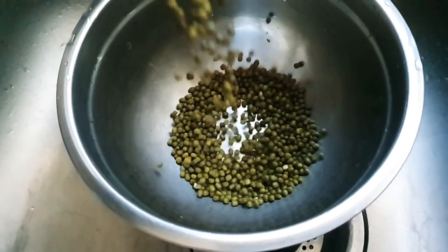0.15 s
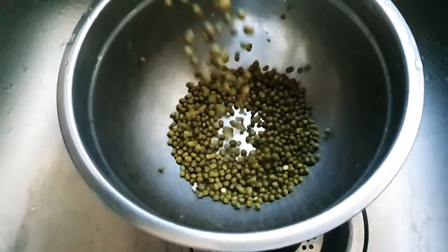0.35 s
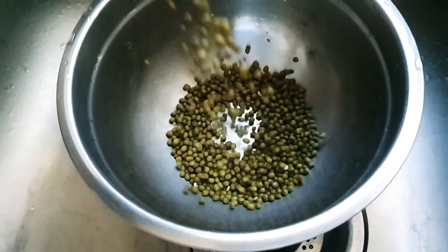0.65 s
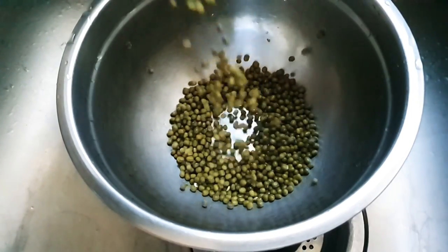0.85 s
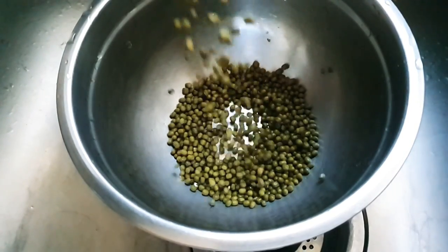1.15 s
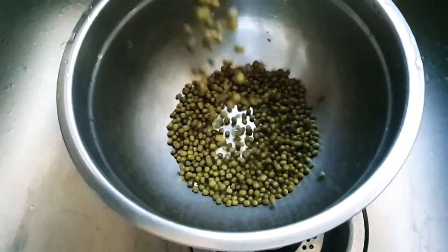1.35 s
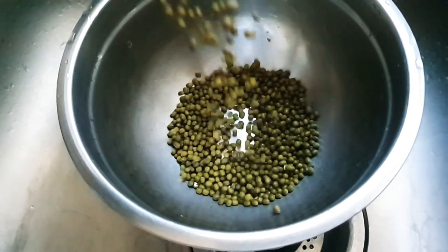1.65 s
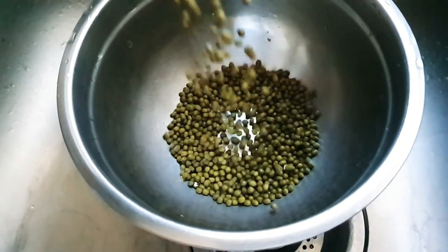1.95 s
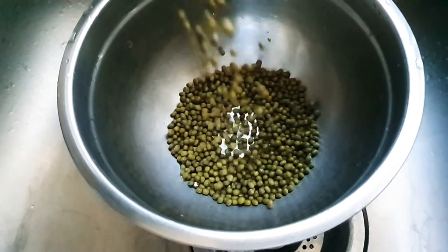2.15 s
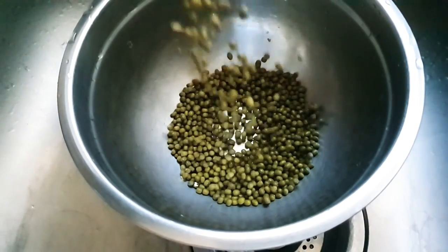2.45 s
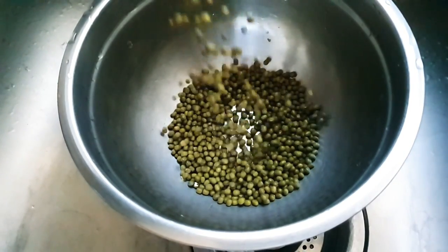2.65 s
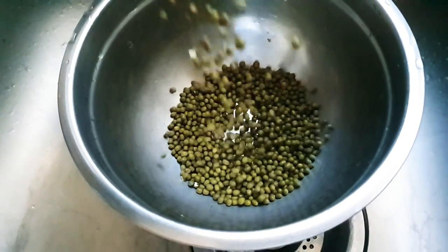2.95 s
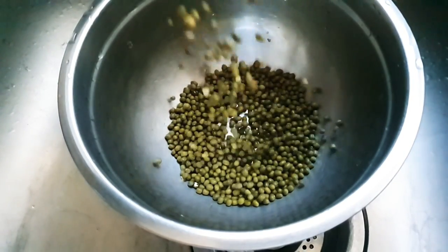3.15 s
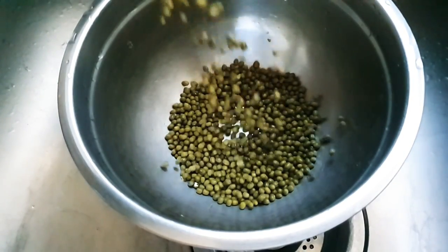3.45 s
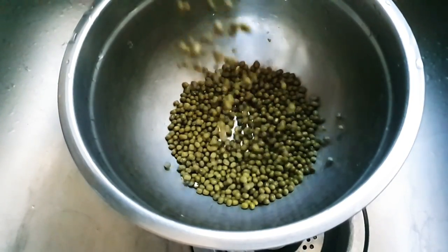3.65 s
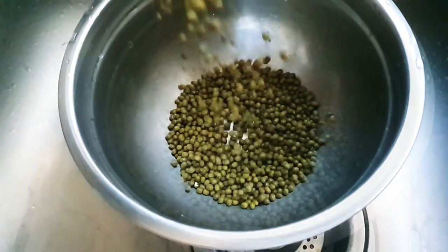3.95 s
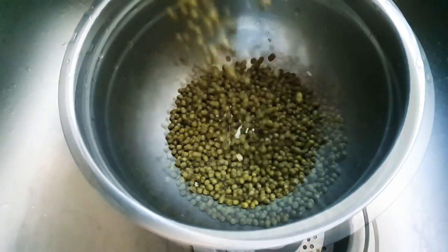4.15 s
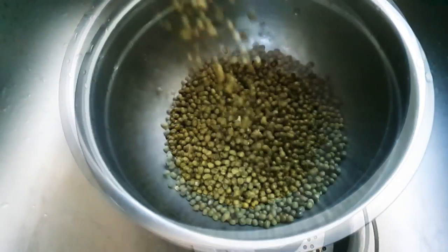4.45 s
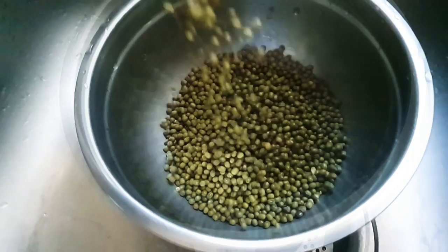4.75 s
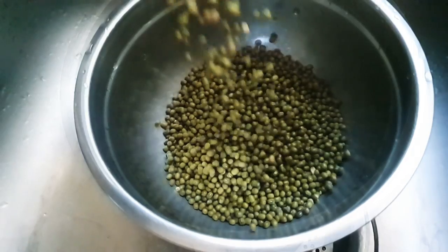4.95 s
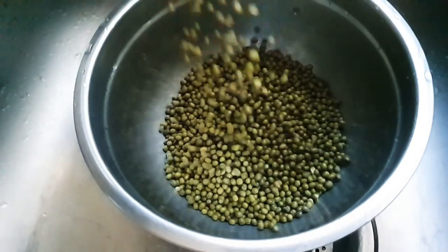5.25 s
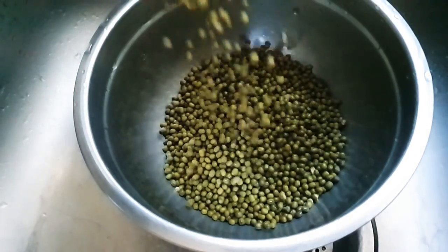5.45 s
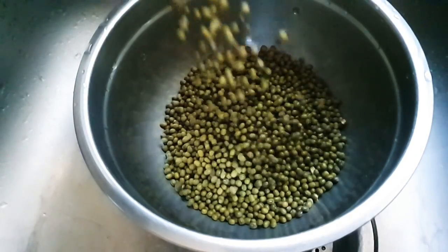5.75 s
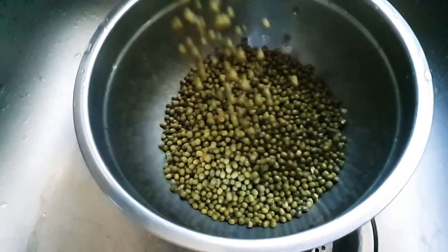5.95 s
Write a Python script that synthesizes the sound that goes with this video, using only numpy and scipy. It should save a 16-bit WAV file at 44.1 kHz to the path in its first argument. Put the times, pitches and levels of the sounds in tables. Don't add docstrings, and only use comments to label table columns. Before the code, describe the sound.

Hard little beans clatter into a metal bowl in a kitchen, already pouring from the start. The close two-sided microphone is dull, loud and overloaded, crackling often in the first two seconds and hard at about 2.5. Boomy bottom thuds and short metallic pings pepper the dense rattle. It softens after four seconds, then ends in bright ringing bursts, with a faint rumble beneath.

```python
import sys
import numpy as np
from scipy import signal
from scipy.fft import rfft, irfft, next_fast_len
from scipy.io import wavfile
from scipy.ndimage import uniform_filter1d, minimum_filter1d

SR = 44100
rng = np.random.default_rng(int(sys.argv[2]) if len(sys.argv) > 2 else 0)


def log_audio(samples):
    frames = np.atleast_2d(samples).T
    limited = np.clip(frames, -1, 1)
    pcm = np.round(limited * 32767).astype(np.int16)
    wavfile.write(sys.argv[1], SR, pcm)


def voltage_ratio(level):
    return 10 ** (np.asarray(level, float) / 20)


N = 269451
TOP_HZ = 3000
# low_hz, high_hz
WALL_BAND_HZ = (960, 1650)

# time_s, level_db
RUMBLE_LEVEL = [
    (0.0, -34),
    (0.5, -38),
    (1.5, -38.5),
    (3.499, -36),
    (4.34, -42.5),
    (4.88, -38.5),
    (5.33, -32.5),
    (6.0, -31),
    (6.11, -37.5),
]
# frequency_hz, density_db_per_hz
RUMBLE_SPECTRUM = [(20, -6.5), (32, -2.5), (38, 3), (46, -7.5), (68, -9), (85, -9.5), (98, 1), (125, -7.5),
                   (170, -13.5), (250, -1)]
# frequency_hz, width_hz, left_db, right_db, right_lag_turns
FLOOR_MODES = [
    (269, 13, 7.5, -2, 0.02),
    (337, 21, -5, -11, 0.37),
    (470, 27, -22, -19, 0.046),
    (566.4, 10, -1, -6, 0.23),
    (614, 65, -14.5, -16.5, 0.82),
]
# frequency_hz, density_db_per_hz
LEFT_PORT_SPECTRUM = [(150, -22), (250, -5.5), (400, -5.5), (650, -4.5), (760, -10), (910, -10.5),
                      (990, -6.5), (1150, -1.5), (1450, -3), (1850, -14), (2300, -10), (2590, -10),
                      (2780, -15.5), (2980, -33.5)]
RIGHT_PORT_SPECTRUM = [(150, -12), (230, -6), (500, -5), (880, -13.5), (990, -16), (1090, 1), (1280, 0),
                       (1410, 3.5), (1550, -8), (1750, -14), (2050, -14.5), (2280, -10.5), (2520, -13.5),
                       (2900, -38.5)]

# time_s, flow_db, floor_cover_share (0 bare to 1 under the heap)
STREAM_FLOW = [(0.0, -15.5, 0.05), (0.449, -17, 0.23), (1.0, -17, 0.12), (1.6, -18, 0),
               (2.301, -16.5, 0.36), (2.9, -18, 0), (3.7, -17.5, 0.19), (4.001, -22, 0.2),
               (4.399, -24.5, 0.1), (4.999, -26.5, 0.7), (5.402, -24.5, 0.8), (5.75, -26.5, 1),
               (6.11, -23.5, 0.8)]
# landing_s, lull_db, lull_length_s, spurt_db
HAND_SHAKES = [(0.354, -5.5, 0.13, 8), (0.428, -5.5, 0.067, 3.5), (0.581, 0, 0.049, 3.5),
               (0.736, -2.5, 0.034, -0.5), (0.842, -1, 0.06, 3), (0.975, -7.5, 0.06, -1.5),
               (1.05, -4, 0.04, 5), (1.226, -5, 0.094, 3.5), (1.486, -2.5, 0.038, 7), (1.575, -8, 0.03, 0),
               (2.099, -3, 0.044, 0), (2.261, -3, 0.063, 1), (2.529, -12, 0.061, 2), (2.763, -7, 0.084, 1),
               (2.986, -3.5, 0.064, -1.5), (3.121, -3.5, 0.079, -1.5), (3.333, -6.5, 0.17, -1),
               (3.699, -4, 0.12, -1), (3.933, -4, 0.27, 3), (4.35, -5, 0.27, 2), (4.453, -6, 0.05, 1.5),
               (4.688, -7, 0.062, 2.5), (5.227, -4.5, 0.23, 4.5), (5.518, -2.5, 0.22, 8),
               (5.593, -1, 0.017, 5), (5.772, -2.5, 0.11, 16), (5.865, 0, 0.019, 7),
               (5.955, 1.5, 0.027, 10), (6.01, -3, 0.02, 5), (6.05, -5, 0.02, 8)]
# loudest_s, over_stream_db, half_length_s
FLOOR_THUMPS = [(0.01, 13.5, 0.021), (0.175, 11.5, 0.07), (0.298, 17.5, 0.022), (0.356, 12.5, 0.03),
                (0.481, 14, 0.063), (0.631, 12, 0.05), (0.743, 11, 0.027), (0.863, 14, 0.055),
                (0.907, 9.5, 0.013), (1.0, 15, 0.02), (1.066, 13.5, 0.033), (1.241, 14, 0.038),
                (1.343, 11, 0.03), (1.522, 14.5, 0.04), (1.63, 9, 0.024), (1.7, 13, 0.02),
                (1.847, 10, 0.06), (1.995, 8.5, 0.07), (2.143, 12, 0.045), (2.326, 15.5, 0.027),
                (2.393, 14, 0.025), (2.639, 7, 0.058), (2.971, 12, 0.02), (3.252, 19.5, 0.016),
                (3.389, 9, 0.035), (3.603, 8, 0.04), (3.7, 11, 0.018), (3.955, 11, 0.052), (4.484, 6, 0.04),
                (4.697, 14.5, 0.035)]
# start_s, peak_db, pitch_hz, left_over_right_db
WALL_STRIKES = [(0.3618, -4.5, 1415, -6), (0.428, -6.5, 1358, -6.5), (0.618, -8.5, 1443, 1),
                (0.889, -8, 1200, 1), (1.0515, 0, 1158, 4.5), (1.1677, -6.5, 1254, -1),
                (1.5771, -4, 1158, -2), (1.6164, -3.5, 1280, -4), (1.9056, -9.5, 1327, -7.5),
                (2.1093, -10.5, 1353, -5), (2.5325, 7, 1240, -8), (2.662, -12, 1383, -2.5),
                (3.0092, -7, 1280, 8.5), (3.202, -11, 1375, 0), (3.456, -11.5, 1096, 0),
                (3.5895, -9.5, 1300, 2.5), (3.7603, -6, 1358, -5), (4.1233, -5, 1130, 6),
                (4.922, -8, 1227, -9.5), (5.241, -15.5, 1302, -6.5), (5.279, -4, 1420, -4),
                (5.3581, -11.5, 1368, -12), (5.5247, -13.5, 1400, -9.5), (5.604, -5, 1320, -1.5),
                (5.765, -6.5, 1383, -4.5), (5.804, -1, 1377, -13), (5.8626, -3, 1388, -4),
                (5.953, -3, 1378, -15), (6.0167, -2.5, 1248, -3.5), (6.0558, 0.5, 1346, -10.5)]

# landing_s, crackle_db
LEFT_OVERLOADS = [(0.096, -42.5), (0.106, -33.5), (0.151, -37), (0.168, -31.5), (0.372, -36.5),
                  (0.5, -35.5), (0.596, -29), (0.612, -36.5), (0.661, -41), (0.749, -31), (0.811, -42),
                  (0.852, -32), (0.891, -39), (0.911, -42), (1.25, -36.5), (1.262, -35), (1.368, -40.5),
                  (1.518, -36.5), (1.756, -41), (1.771, -42), (1.911, -37), (1.978, -42), (2.058, -35.5),
                  (2.142, -38.5), (2.421, -36.5), (2.544, -28.5), (2.835, -42.5), (3.013, -39), (3.39, -35),
                  (3.457, -40.5)]
RIGHT_OVERLOADS = [(0.131, -37), (0.161, -37), (0.178, -36.5), (0.213, -30), (0.365, -28), (0.516, -41.5),
                   (0.819, -36.5), (0.844, -39.5), (1.243, -39), (1.359, -42.5), (1.508, -35.5),
                   (2.536, -17.5), (3.766, -44.5), (5.798, -41.5), (5.944, -50), (5.956, -29.5),
                   (5.969, -59), (6.06, -25), (6.072, -47)]
# landing_s, left_crackle_db,
# right_crackle_db
BOTH_OVERLOADS = [(0.188, -45, -48), (0.207, -30.5, -34), (0.457, -30.5, -25), (0.471, -34, -35),
                  (0.512, -42, -70), (0.545, -48, -48), (0.56, -46, -70), (0.625, -29.5, -41),
                  (0.639, -32, -31), (0.668, -46, -42), (0.681, -44, -70), (1.053, -42, -70),
                  (1.068, -25, -37), (1.082, -30, -35), (1.381, -44, -70), (2.068, -35.5, -45),
                  (2.111, -41, -39.5), (2.191, -44, -70), (2.539, -30, -20), (5.807, -46, -25),
                  (5.815, -70, -38), (5.866, -36, -34), (5.873, -70, -33)]


def evened(x):
    return x / np.sqrt(np.mean(x ** 2) + 1e-20)


def read(spectrum, hz):
    f, value = np.transpose(spectrum)
    return np.interp(np.log(hz + 1), np.log(f + 1), value)


def colour(x, gain):
    size = next_fast_len(x.shape[-1])
    hz = np.fft.rfftfreq(size, 1 / SR)
    return irfft(rfft(x, size) * gain(hz), size)[..., :x.shape[-1]]


def above(hz, edge_hz):
    return 1 / np.sqrt(1 + np.exp(24 * np.log(edge_hz / (hz + 1) + 1e-9)))


def between(low_hz, high_hz):
    return lambda hz: above(hz, low_hz) * above(high_hz, hz)


def steadied(x, seconds, share):
    power = uniform_filter1d((x ** 2).mean(0), round(seconds * SR))
    return evened(x / (abs(power) + 1e-12) ** (share / 2))


def ports(hz):
    level_db = np.array([read(LEFT_PORT_SPECTRUM, hz), read(RIGHT_PORT_SPECTRUM, hz)])
    return voltage_ratio(level_db) * (hz < TOP_HZ)


def rumble():
    time_s, level_db = np.transpose(RUMBLE_LEVEL)
    both, left, right = rng.standard_normal((3, N))
    own = colour(np.array([left, right]), lambda hz: np.clip(hz / 120, .3, 1))
    shake = colour(1.6 * both + own, lambda hz: voltage_ratio(read(RUMBLE_SPECTRUM, hz)) * (hz < 250))
    level_db = np.interp(np.arange(N) / SR, time_s, level_db)
    return voltage_ratio(level_db + np.array([[0.6], [-3.6]])) * evened(shake)


def landings(per_s, spread_db):
    size = voltage_ratio(spread_db * np.minimum(rng.exponential(1, N), 5))
    lands = rng.random(N) < per_s / SR
    return size * lands * rng.choice([-1., 1.], N)


def knocks():
    blows = landings(per_s=70, spread_db=4.0)
    side = voltage_ratio(5.0 * rng.uniform(-1, 1, N))
    t = np.arange(SR // 200) / SR
    blow = rng.standard_normal((2, len(t))) * voltage_ratio(-60 * t / 0.004)
    return evened(signal.oaconvolve(blows * np.array([side, 1 / side]), blow, axes=1)[:, :N])


def strays(flow_db):
    per_s, over_flow_db = 7.3, 1
    gap, size, pitch, side = rng.random((90, 4)).T
    start_s = np.cumsum((.4 + 1.2 * gap) / per_s)
    peak_db = np.interp(start_s, np.arange(N) / SR, flow_db) + over_flow_db + 6 * (size - .5)
    rows = zip(start_s, peak_db, 1080 + 340 * pitch, 14 * (side - .7))
    return [row for row in rows if row[0] < N / SR]


def strikes(rows):
    t, out = np.arange(SR // 10) / SR, np.zeros((2, N + SR))
    shape = (1 - np.exp(-t / 0.0014)) * voltage_ratio(-60 * t / 0.039)
    for (start_s, peak_db, pitch_hz, pan_db), chance in zip(rows[::-1], rng.random((150, 6))):
        split_hz, phase_turns = 60 + 60 * chance[:2, None], 0.38 * chance[2:4, None]
        beat = np.cos(2 * np.pi * (split_hz * t + phase_turns))
        pair = np.sin(2 * np.pi * pitch_hz * t) * beat
        click_hz = 2200 + 450 * chance[4:, None]
        click = np.sin(2 * np.pi * click_hz * t) * voltage_ratio(-8 - 60 * t / 0.01)
        level = voltage_ratio(peak_db + 3.5 + np.array([[.5], [-.5]]) * pan_db)
        at = round(start_s * SR)
        out[:, at:at + len(t)] += level * shape * (pair + click)
    return out[:, :N]


def boom(hits):
    t, ring = np.arange(SR // 6) / SR, 0
    for hz, width_hz, left_db, right_db, lag_turns in FLOOR_MODES:
        swing = np.sin(2 * np.pi * (hz * t - np.array([[0], [lag_turns]])))
        decay = np.sqrt(width_hz) * np.exp(-np.pi * width_hz * t)
        ring = ring + voltage_ratio(np.array([[left_db], [right_db]])) * decay * swing
    return signal.oaconvolve(hits[None], ring, axes=1)[:, :N]


def thumping(t):
    runs = (voltage_ratio(db) ** 2 * np.exp(-((t - s) / half_s) ** 2) for s, db, half_s in FLOOR_THUMPS)
    return np.sqrt(1 + sum(runs))


def floor_boom(hits):
    off_centre = boom(landings(per_s=3700, spread_db=2.0)) * np.array([[.15], [.7]])
    return colour(steadied(boom(hits) + off_centre, 0.16, 0.89), lambda hz: above(hz, 234))


def scatter(hits, t60, shared, count=5):
    t = np.arange(SR // 7) / SR
    spot = rng.integers(0, count, N)
    both, left, right = rng.standard_normal((3, count, len(t))) * voltage_ratio(-60 * t / t60)
    modes = rfft(np.sqrt(shared) * both + np.sqrt(1 - shared) * np.array([left, right]))
    modes /= np.sqrt(uniform_filter1d((abs(modes) ** 2).mean(1, keepdims=True), size=5))
    rings, size = irfft(modes, len(t)), next_fast_len(N + len(t))
    hits_by_spot = hits * (spot == np.arange(count)[:, None])
    return irfft((rfft(hits_by_spot, size) * rfft(rings, size)).sum(1), size)[:, :N]


def heap_thuds(hits):
    thud = colour(scatter(hits, t60=0.082, shared=0.085), between(200, WALL_BAND_HZ[0]))
    return steadied(thud, 0.13, 0.15)


def bean_clicks(hits):
    click = colour(scatter(hits, t60=0.056, shared=0), between(WALL_BAND_HZ[1], TOP_HZ))
    return steadied(click, 0.2, 0.37)


def wall_ring(hits, cover):
    wall = colour(scatter(hits, t60=0.058, shared=0.038), between(*WALL_BAND_HZ))
    lower_modes = colour(wall, lambda hz: above(1130, hz))
    buried = 1 - voltage_ratio(-15.5 * cover ** 3)
    return steadied(wall - lower_modes * buried, 0.022, 0.85)


def shaking(t):
    landing_s, lull_db, length_s, spurt_db = np.transpose(HAND_SHAKES)[:, :, None]
    landed = np.clip((t - landing_s) / 0.0061, 0, 1)
    lulls = lull_db * np.clip(1 + (t - landing_s) / length_s, 0, 1) * (1 - landed)
    spurts = spurt_db * landed * np.exp(-np.maximum(t - landing_s, 0) / 0.062)
    return lulls.sum(0), spurts.sum(0)


def pour():
    t = np.arange(N) / SR
    coarse = t[::44]
    time_s, flow_db, cover = np.transpose(STREAM_FLOW)
    flow_db, cover = np.interp(t, time_s, flow_db), np.interp(t, time_s, cover)
    lulls, spurts = (np.interp(t, coarse, curve) for curve in shaking(coarse))
    thumps = np.interp(t, coarse, thumping(coarse))

    def gain(over_flow_db, lull_share, spurt_share, buried_db):
        return voltage_ratio(flow_db + over_flow_db + lull_share * lulls + spurt_share * spurts + buried_db * cover)

    hits = landings(per_s=2200, spread_db=3.5)
    floor = gain(-6, 2.6, 0.43, buried_db=-11) * thumps * floor_boom(hits)
    heap = gain(7, 0.81, 0.18, buried_db=-4.5) * heap_thuds(hits)
    clicks = gain(9, 0.84, 0.88, buried_db=-0.5) * bean_clicks(hits)
    wall = gain(3.5, 1, 1, buried_db=0) * wall_ring(hits, cover)
    single = gain(6.5, 1, 0, buried_db=0) * knocks()
    hard = strikes(strays(flow_db + lulls) + WALL_STRIKES)
    return floor + colour(wall + heap + clicks + single + hard, ports)


def heaviest(x):
    heavy, top_db = np.zeros((2, N + SR)), np.full((2, N + SR), -.6)
    for port, own in enumerate((LEFT_OVERLOADS, RIGHT_OVERLOADS)):
        shared = [(row[0], row[1 + port]) for row in BOTH_OVERLOADS]
        for landing_s, crackle_db in own + shared:
            half_s = (.005 + .0002 * (crackle_db + 40)) * (crackle_db > -55)
            span = slice(round((landing_s - half_s) * SR), round((landing_s + half_s) * SR))
            heavy[port, span] = 1
            top_db[port, span] = 1.35 + 0.15 * (crackle_db + 39.5)
    reach = SR // 250
    peak = -minimum_filter1d(-abs(x), 2 * reach, axis=1) + 1e-9
    gain_db = np.minimum(top_db[:, :N] - 20 * np.log10(peak), 9 * heavy[:, :N])
    return x * voltage_ratio(uniform_filter1d(gain_db, reach, axis=1))


def scene():
    beans = heaviest(pour())
    return beans + rumble()


def top_cut(x):
    return signal.sosfilt(signal.butter(12, 15900, fs=SR, output="sos"), x)


def record(dry):
    steep = signal.firwin(1023, TOP_HZ, window=("kaiser", 10), fs=SR)
    dull = signal.oaconvolve(dry, steep[None], "same")
    clipped = np.clip(dull, -1, 1)
    crackle = colour(clipped - dull, between(TOP_HZ, 4000))
    size = SR // 16
    burst = np.hanning(size) * np.linspace(.2, 1.8, size) * rng.standard_normal((2, size))
    smear = signal.oaconvolve(crackle, burst / np.linalg.norm(burst[0]), "same")
    hiss = colour(rng.standard_normal(dry.shape), between(4300, 15500))
    mix = np.clip(clipped + voltage_ratio(-11.5) * smear, -1, 1) + voltage_ratio(-82) * hiss
    return top_cut(mix)


dry = scene()
out = record(dry)
log_audio(out)
```